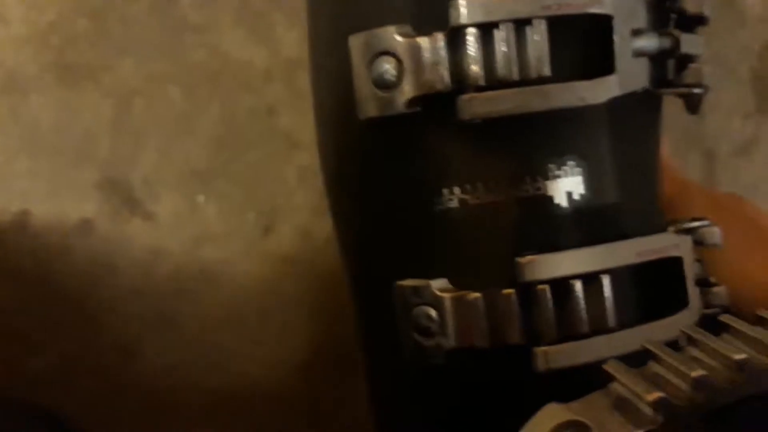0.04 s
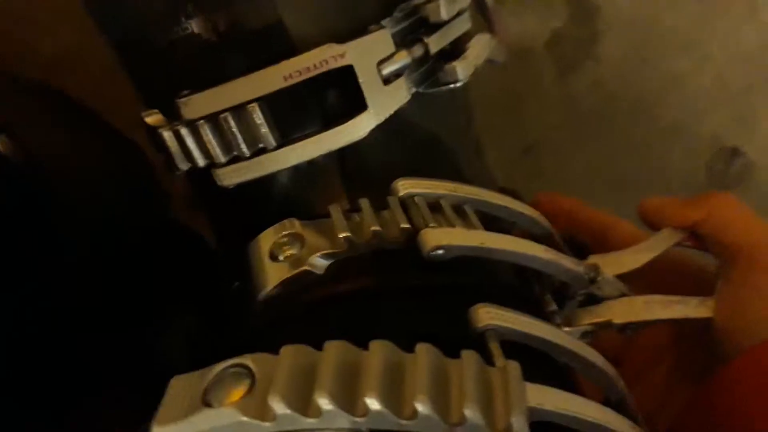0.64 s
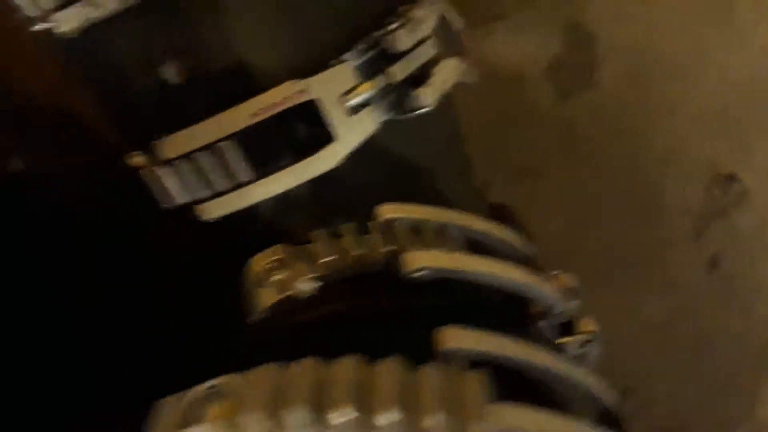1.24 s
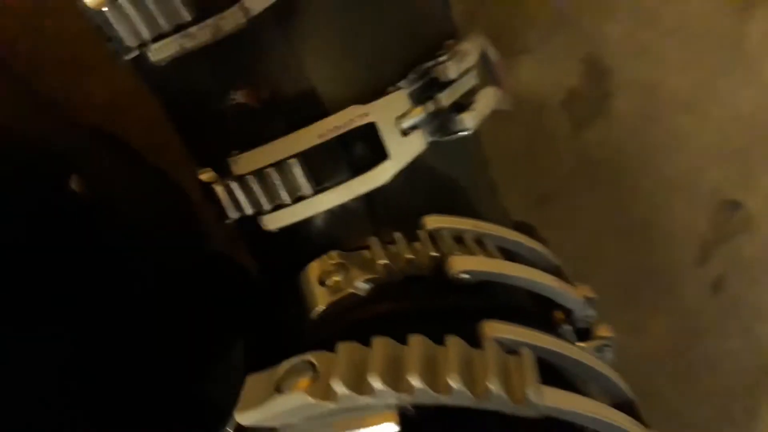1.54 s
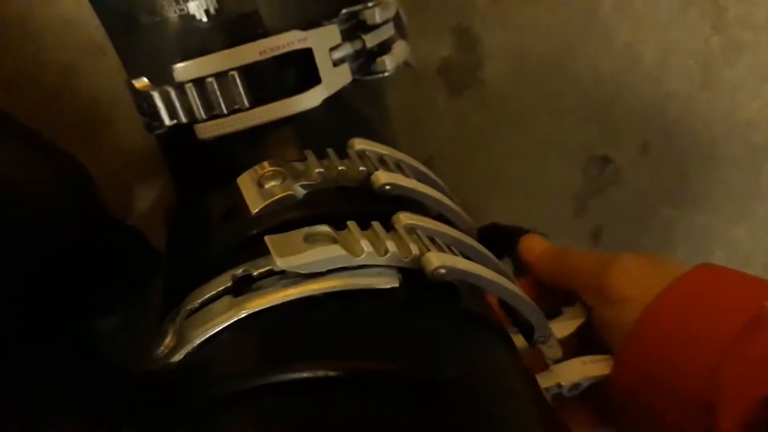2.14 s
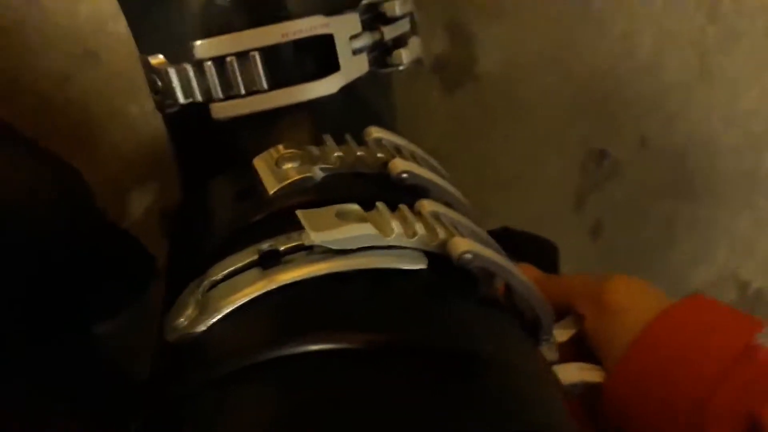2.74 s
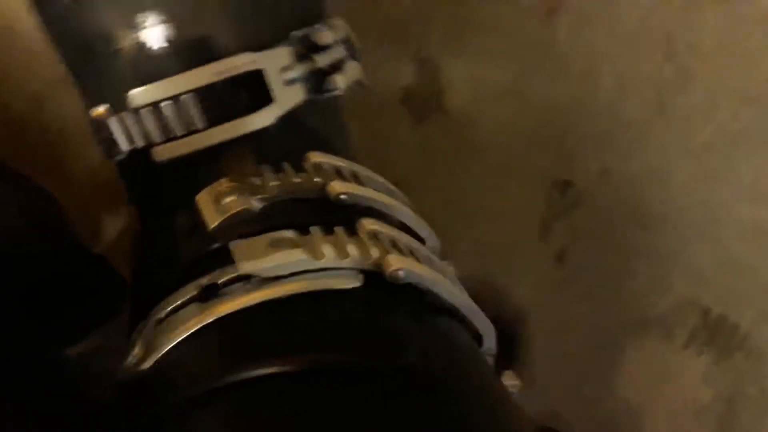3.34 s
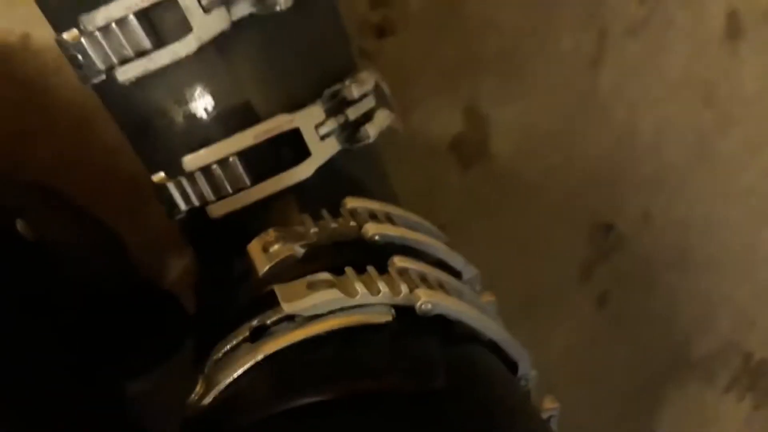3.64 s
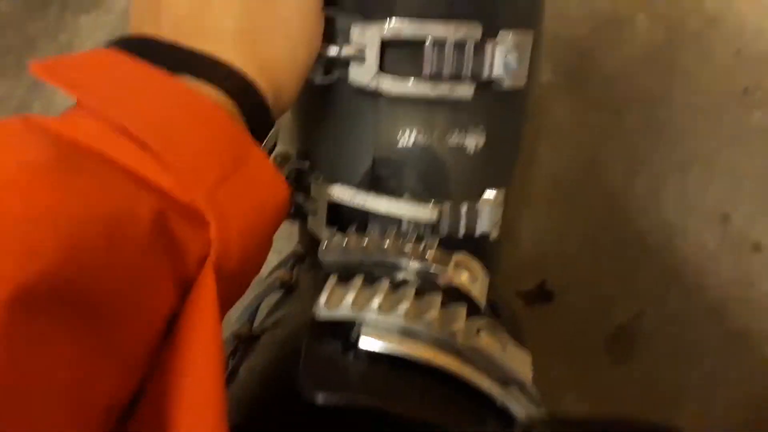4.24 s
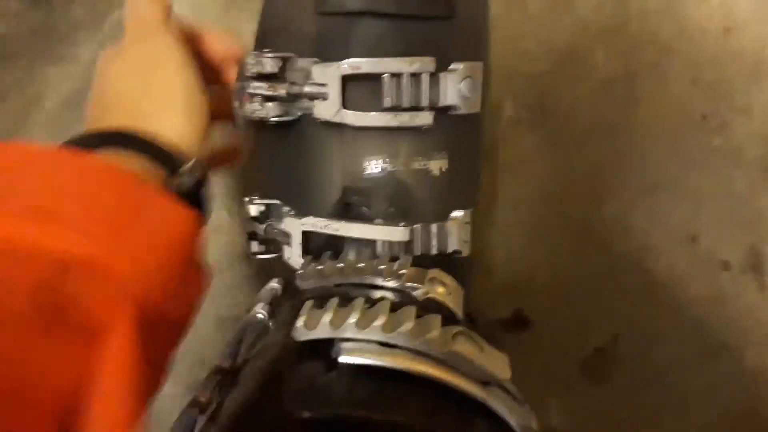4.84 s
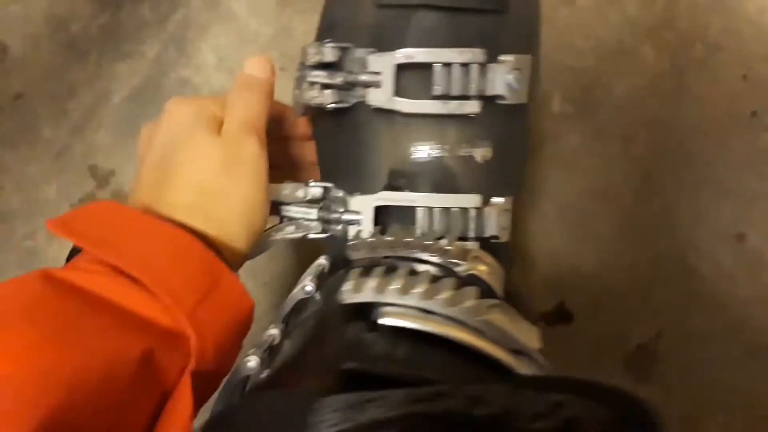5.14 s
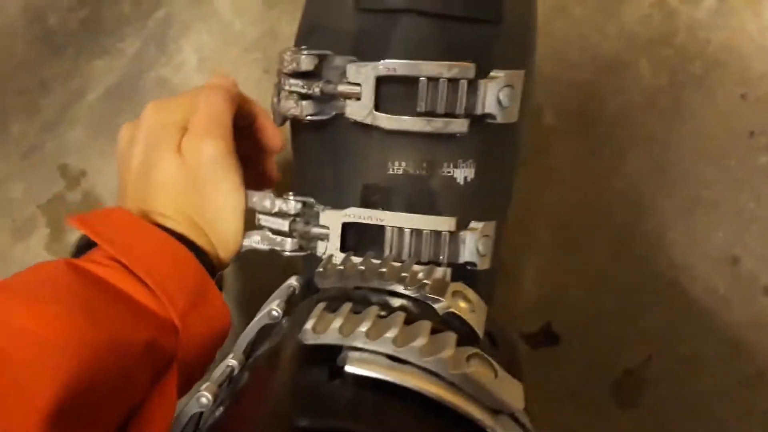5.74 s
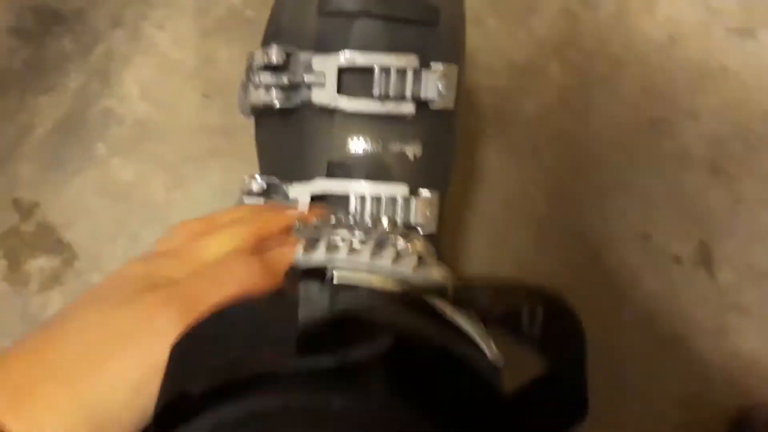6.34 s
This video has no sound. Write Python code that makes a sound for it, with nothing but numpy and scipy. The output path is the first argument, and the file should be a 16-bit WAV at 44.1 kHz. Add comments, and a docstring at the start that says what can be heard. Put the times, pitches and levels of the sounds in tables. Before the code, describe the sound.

Close up, metal buckles click and knock against a plastic ski boot, then snap closed with a sharp crack and a brief rattle. Three snaps come with light ratchet clicks and faint sleeve rustling between them. Then a tight lever gives a stuttering creak and shuts with a fourth snap, followed by a few small ticks. Each snap echoes briefly in a small, hard-walled room.

```python
"""A small room with a concrete floor, where ski boot buckles are closed by hand, close up.
Metal bails click over their ratchet teeth; four levers snap shut, thump the plastic shell and set the
room ringing. The last one creaks in stick-slip jerks as it is forced over. In between, a jacket sleeve
rustles and fingers slide on the shell, over a thin hiss and a faint rumble."""
import sys
import numpy as np
from scipy import signal
from scipy.fft import rfft, irfft
from scipy.io import wavfile

SR = 44100
rng = np.random.default_rng(int(sys.argv[2]) if len(sys.argv) > 2 else 0)


def to_wav(sig):
    """Store sig (one row per channel, or 1-D mono) as 16-bit WAV at the path in sys.argv[1].

    Samples outside -1..1 are clipped; the rate is SR.
    """
    pcm = np.clip(np.atleast_2d(sig), -1, 1) * 32767
    pcm = np.round(pcm).astype(np.int16)
    wavfile.write(sys.argv[1], SR, pcm.T)  # frames by channels


N = 291060
TIME = np.arange(N) / SR
HIT_SAMPLES = 4096
HIT_TIME = np.arange(HIT_SAMPLES) / SR
HIT_FREQS = np.maximum(np.fft.rfftfreq(HIT_SAMPLES, 1 / SR), 1)
ROOM_CHANGE_S = 4.0  # the room's colour shifts here

# Lever hits; the first leaves only its tail in the scene. The ring colours rattle and room.
# start_s, crack_db, thump_db, room_db, ring_hz, ring_db, treble_db
SNAPS = [(-.16, -8, -35, -7.5, 1370, 1.5, -3.5), (1.1644, -10, -4.5, -9, 428, 1.5, 2.5),
         (3.3344, -10, -5.5, -4.5, 900, -0.5, 4), (4.54, -7, -11.5, -1, 1130, 10, 3.5),
         (5.8677, -7, -38, -5, 480, 8, -6)]
# EQ of a snap: freq_hz, gain_db
SNAP_EQ = [(60, -14.5), (270, -2.5), (700, 2.5), (1500, 1), (2700, -3.5), (4000, -6.5), (5200, -6.5),
           (6500, -9.5), (10000, -9), (13000, -12), (16000, -16)]
def lever_snaps(thump_hz=102, thump_decay_s=0.0028, scrape_lead_s=0.0034):
    """A lever flips over centre: a brief scrape, a crack, a shell thump, a rattle and a loud room tail."""
    out = np.zeros((2, N))
    phase = 2 * np.pi * thump_hz * HIT_TIME + .5 + .17 * np.array([[1], [-1]])
    thump = np.cos(phase) * np.exp(-HIT_TIME / thump_decay_s) * (1 - np.exp(-HIT_TIME / 0.00021))
    tail_eq = [(60, -2), (200, 0.7), (600, -0.85), (2000, -0.1), (6000, 4), (14000, 8.5)]
    for start_s, crack_db, thump_db, room_db, ring_hz, ring_db, treble_db in SNAPS:
        direct = hit_tone(SNAP_EQ, 560, 5.4, treble_db)
        scrape = hit(direct, chatter_s=0.00071, chatter_db=20.5, metal_db=-12)
        add(out, start_s - scrape_lead_s, undb(crack_db - 20) * scrape)
        crack = hit(direct, chatter_s=0.00098, chatter_db=6.5, metal_db=-12.5)
        add(out, start_s, undb(crack_db) * crack + undb(thump_db) * thump)
        radiated = hit_tone(SNAP_EQ, ring_hz, ring_db, treble_db, octaves=0.53)
        add(out, start_s, undb(room_db - 11) * bail_rattle(radiated))
        walls = room_impulse(tail_eq, late=int(start_s > ROOM_CHANGE_S))
        tail = unit_energy(signal.fftconvolve(walls, irfft(radiated)[None], axes=1))
        add(out, start_s, undb(room_db) * np.sqrt(0.002 * SR) * tail)
    return out


def bail_rattle(tone, landings=7, span_s=0.07, fall_db=14):
    """The loose bails jump and land again after a snap, dying away."""
    out = np.zeros((2, 2 * HIT_SAMPLES))
    for when, softness in rng.uniform(0, 1, (landings, 2)):
        landing = hit(tone, chatter_s=0.00042, chatter_db=4, metal_db=10)
        add(out, 0.013 + span_s * when, undb(-fall_db * when - 2.3 * softness) * landing)
    return out


# Bails catching on the teeth: start_s, level_db, ring_hz, ring_db, treble_db, pan_left_db, bounce_db
CATCHES = [(.157, -57.5, 5430, 12, 27, 6, -16), (.522, -50.5, 5450, 13, 17, 4, -23),
           (.8068, -9, 1850, 5.5, -6, 5.5, -21.5), (1.0738, -16, 1590, 4, -0.5, 1.5, -8),
           (1.8183, -19, 560, 4.5, 12, 7, -17), (2.514, -19.5, 4300, -0.5, 15.5, 11, -8.5),
           (2.654, -26, 613, 6, -4.5, 4, -19), (2.8043, -21, 600, 5.5, -2.5, 8.5, -21.5),
           (2.9778, -48.5, 800, -13, -5, 11, -20), (3.15, -14, 2850, 0, 8.5, 10, -4.5),
           (3.2461, -20, 1280, 7.5, -3.5, 7.5, -16), (3.304, -9.5, 2280, 5, 12, 8.5, -12),
           (4.6316, -21, 4900, 17, 5, -25, -27), (5.0114, -30.5, 7040, 0, 14, 0, -16),
           (5.054, -30, 1188, 10.5, 13.5, 5, -24), (5.863, -13.5, 10200, 4, 33, 8, 0),
           (6.292, -30.5, 5560, 25, -7, 6, -0.5), (6.357, -36, 1040, 0, 0, 9, 0.5),
           (6.422, -41, 8000, 2, 6, 2, -20)]
# Levers and fingers knocking on the shell: start_s, level_db, ring_hz, pan_left_db
KNOCKS = [(0.5673, -39, 590, 12), (0.726, -34, 680, 7), (.788, -30, 690, -9), (.806, -8.5, 665, 3),
          (.829, -33, 650, 5), (1.0666, -22.5, 666, 5), (1.094, -24.5, 653, -1), (1.1189, -20, 700, 4),
          (1.8004, -42, 860, 9), (1.8789, -39.5, 700, 7), (2.724, -38.5, 650, 13), (3.1377, -43, 799, 9.5),
          (3.6217, -38.5, 268, -2), (4.1978, -38, 380, 3), (4.2548, -30.5, 330, -1), (4.448, -33.5, 563, 2),
          (4.5121, -27, 680, 0)]
# EQ of catches and knocks: freq_hz, gain_db
CLICK_EQ = [(60, -26), (200, -9), (450, 4), (1100, 4.5), (1600, -2), (2600, -4), (4500, -4), (6500, -8.5),
            (10000, -7.5), (13000, -14.5), (16000, -19)]
def clicks_and_knocks(bounce_s=.0073, knock_ring_db=12, knock_treble_db=-13):
    """Bails catch and bounce, the shell takes dull knocks. Returns the close sound and a reverb send."""
    blows = [(s, db, hz, knock_ring_db, knock_treble_db, pan_db) for s, db, hz, pan_db in KNOCKS]
    for start_s, level_db, *voicing, bounce_db in CATCHES:
        blows += [(start_s, level_db, *voicing), (start_s + bounce_s, level_db + bounce_db, *voicing)]
    close, send = np.zeros((2, N)), np.zeros((2, N))
    for start_s, level_db, ring_hz, ring_db, treble_db, pan_db in blows:
        tone = hit_tone(CLICK_EQ, ring_hz, ring_db, treble_db, octaves=0.39)
        click = hit(tone, chatter_s=0.0011, chatter_db=6, metal_db=0)
        pan = undb(np.array([[pan_db], [-pan_db]]) / 2)
        add(close, start_s, undb(level_db) * click * pan / np.sqrt(np.mean(pan ** 2)))
        # the walls get a blend of all directions, so the ring is flatter
        blend = hit_tone(CLICK_EQ, ring_hz, 0.29 * ring_db, treble_db, octaves=0.5)
        add(send, start_s, undb(level_db) * hit(blend, chatter_s=0.00092, chatter_db=1.5, metal_db=-15))
    return close, send


# Accents of the creak, its hardest jerks: start_s, level_db
JERKS = [(5.0974, -26.5), (5.1236, -26), (5.1654, -28), (5.1995, -25), (5.2511, -24), (5.2954, -20),
         (5.3357, -20), (5.3933, -18), (5.4139, -21.5), (5.443, -17.5), (5.4832, -17.5), (5.5651, -17.5),
         (5.6306, -15.5), (5.668, -22), (5.695, -18.5), (5.7214, -21), (5.759, -20), (5.7987, -22)]
# The creak hardens as the strap tightens: time_s, small_slip_db, treble_db
STRAIN = [(5.1, -29, -6), (5.15, -26.5, -5), (5.22, -32, -4), (5.28, -23.5, -2), (5.43, -23, -2),
          (5.47, -35, 4), (5.54, -34, 13), (5.63, -29.5, 4), (5.72, -27, 13), (5.8, -31, 17)]
# Pace of the sticking and slipping: time_s, rate_hz
SLIP_RATE = [(5.1, 42), (5.23, 24), (5.28, 48), (5.45, 52), (5.52, 76), (5.7, 76), (5.78, 50)]
# EQ of a slip: freq_hz, gain_db
CREAK_EQ = [(30, -33), (70, -11.5), (200, 1), (550, 8), (1000, 3), (1600, -2.5), (2200, -11), (3800, -7),
            (5200, -10.5), (6500, -19.5), (10000, -22), (16000, -30)]
def lever_creak(jitter_s=.0007, scatter_db=2.5, give_s=.0052, settle_s=.007, shell_hz=900):
    """The loaded lever sticks and slips on the shell: small slips fill the time between hard jerks."""
    strain_s, slip_db, treble_db = np.transpose(STRAIN)
    slips = list(JERKS)
    for (start_s, _), (end_s, _) in zip(JERKS, JERKS[1:]):
        rate_hz = np.interp((start_s + end_s) / 2, *np.transpose(SLIP_RATE))
        steps = int(round((end_s - start_s) * rate_hz))
        for s in np.linspace(start_s, end_s, steps + 1)[1:-1]:
            slips.append((rng.normal(s, jitter_s), rng.normal(np.interp(s, strain_s, slip_db), scatter_db)))
    out = np.zeros((2, N))
    for s, db in slips:
        hard_db = np.interp(s, strain_s, treble_db)
        # each slip gives before and settles after: dull taps that fade as the strap gets tight
        tap_db = np.interp(s, strain_s, slip_db) - 0.53 * hard_db
        early, late = rng.uniform(.8, 1.2, 2)
        give = (s - give_s * early, tap_db - 7, hard_db - 13)
        settle = (s + settle_s * late, tap_db - 3, hard_db - 13)
        for start_s, level_db, bright_db in [(s, db, hard_db), give, settle]:
            ring_hz = shell_hz * np.exp(rng.normal(0, 0.056))
            tone = hit_tone(CREAK_EQ, ring_hz, 4, bright_db, octaves=0.29)
            slip = hit(tone, chatter_s=0.0011, chatter_db=2, metal_db=-19, right_lag_s=.00004)
            add(out, start_s, undb(level_db) * slip)
    return out


# Metallic ring of the buckle: pitch_hz, t60_s, level_db
BUCKLE_MODES = [(2540, 0.0089, -13), (2680, .015, -8), (3430, 0.023, -15.5), (4050, .02, -15),
                (5300, 0.055, -13), (7130, .012, -15.5), (10260, .015, -13), (12150, .05, -22),
                (14300, .04, -21)]
def hit(tone, chatter_s, chatter_db, metal_db, right_lag_s=0.00011):
    """One contact: a push, a burst of chatter and the buckle's ringing modes, filtered by the tone."""
    burst = rng.standard_normal((2, HIT_SAMPLES)) * np.sqrt(HIT_TIME) * np.exp(-HIT_TIME / chatter_s)
    chatter = stereo_spectra(unit_energy(burst), split_hz=1000)
    low_cut = HIT_FREQS / (HIT_FREQS - 900j)
    force = 1 + undb(chatter_db) * chatter * low_cut
    ring = 0
    for pitch_hz, t60_s, level_db in BUCKLE_MODES:
        detune = rng.normal(1, 0.0027)
        phase = 2 * np.pi * pitch_hz * detune * HIT_TIME + rng.uniform(0, 2 * np.pi, (2, 1))
        ring += undb(level_db) * unit_energy(np.sin(phase) * undb(-60 * HIT_TIME / t60_s))
    delay = np.exp(-2j * np.pi * HIT_FREQS * np.array([[0], [right_lag_s]]))
    blow = irfft((force + undb(metal_db) * rfft(ring)) * tone * delay)
    return unit_energy(blow * np.linspace(1, 0, HIT_SAMPLES)) * np.sqrt(0.0014 * SR)


def hit_tone(eq, ring_hz, ring_db, treble_db, octaves=0.52):
    """Filter for a contact: base EQ, one broad resonance and a treble shelf."""
    bell_db = ring_db * np.exp(-.5 * (np.log2(HIT_FREQS / ring_hz) / octaves) ** 2)
    shelf_db = treble_db * HIT_FREQS ** 2 / (HIT_FREQS ** 2 + 2800 ** 2)
    cepstrum = irfft(np.log(undb(curve_at(eq, HIT_FREQS) + bell_db + shelf_db)))
    # minimum phase keeps the attack sharp
    cepstrum[1:HIT_SAMPLES // 2] *= 2
    cepstrum[HIT_SAMPLES // 2 + 1:] = 0
    return np.exp(rfft(cepstrum))


# Arm moves: start_s, length_s, rub_db, swish_db
STROKES = [(0.73, 0.19, -58, -47), (0.984, 0.4, -44, -50), (1.55, 0.47, -68.5, -75),
           (2.498, 0.28, -64, -62), (2.86, 0.065, -70, -62), (4.1, 0.22, -52, -52.5),
           (4.407, 0.3, -44.5, -41), (4.697, 0.32, -57, -57), (4.849, 0.22, -85, -45.5),
           (5.052, 0.24, -49.5, -43.5), (5.39, 0.47, -37, -42.5), (6.03, .3, -55, -52)]
# EQs of the low rub and the airy swish: freq_hz, gain_db
RUB_EQ = [(30, -38), (70, -16.5), (150, 1.5), (280, 2.5), (600, -3.5), (1300, -4.5), (2500, -7),
          (5000, -29)]
SWISH_EQ = [(500, -7), (1500, -0.5), (3200, -1.5), (5000, 8), (6500, -5), (10500, -3.5), (13000, -8.5),
            (16000, -6)]
def sleeve_rustle():
    """Nylon rubs and swishes with each stroke of the arm."""
    envelopes = np.zeros((2, N))
    for start_s, length_s, rub_db, swish_db in STROKES:
        add(envelopes, start_s, undb([[rub_db], [swish_db]]) * swell(length_s))
    rub = noise(RUB_EQ) * envelopes[0] * flutter(rate_hz=70, depth_db=2)
    swish = noise(SWISH_EQ) * envelopes[1] * flutter(rate_hz=190, depth_db=1.5)
    return rub + swish


# Slides over the shell: start_s, length_s, level_db, peak_hz
SLIDES = [(1.065, 0.034, -34, 1500), (1.083, 0.13, -40.5, 4620), (1.75, 0.072, -58, 900),
          (3.568, 0.29, -67.5, 1695), (3.6, 0.058, -54, 1690), (4.232, 0.19, -54, 276),
          (6.087, 0.12, -44.5, 3730), (6.277, 0.079, -40.5, 5590)]
def finger_slides():
    """Fingers and cloth slide over the shell in short, grainy swells of friction noise."""
    out = np.zeros((2, N))
    for start_s, length_s, level_db, hz in SLIDES:
        eq = [(hz / 20, -35), (hz / 6, -16), (hz / 2, -6), (hz, 0), (hz * 2, -9), (hz * 10, -48)]
        friction = noise(eq, size=SR) * flutter(rate_hz=300, depth_db=3)[:SR]
        add(out, start_s, undb(level_db) * friction * swell(length_s))
    return out


# Reverb time: freq_hz, t60_s
ROOM_DECAY = [(80, 0.5), (250, 0.63), (560, 0.52), (1470, 0.49), (3880, 0.33), (10200, 0.3), (16000, 0.2)]
# The room's colour, one curve before and one after ROOM_CHANGE_S: freq_hz, gain_db
ROOM_EQ = [
    [(50, -6.5), (120, -1.5), (190, -1), (270, -2), (700, 2), (1500, -0.5), (2400, 2), (4000, 1.5),
     (9000, -0.5)],
    [(50, -34), (120, 3), (190, 1), (270, 1.5), (700, -6), (1500, -0.5), (2400, -0.5), (4000, 3),
     (9000, -1)],
]
# Low room resonances and the higher ring of shell and buckle: pitch_hz, t60_s, early_db, late_db
LINGERING_TONES = [(162.3, 0.68, -37, -14), (245, 0.72, -22, -26), (262.3, .9, -26.5, -23),
                   (301.6, 0.66, -22.5, -19.5), (388, 0.21, -25.5, -22), (485, 0.78, -23, -43.5),
                   (543, 0.43, -22, -34.5), (667, 0.33, -25.5, -26), (931, .4, -27, -43),
                   (1045, .35, -31, -44), (1306, 0.45, -30, -37), (1855, .35, -28.5, -27),
                   (2280, .35, -26, -35)]
def room_impulse(eq, late, predelay_s=0.004, build_s=0.0026):
    """The walls answer after a few ms and the treble dies first; room, shell and buckle tones linger."""
    t = np.arange(SR) / SR
    freqs = np.maximum(np.fft.rfftfreq(SR, 1 / SR), 1)
    gain = undb(curve_at(eq, freqs) + curve_at(ROOM_EQ[late], freqs))
    spectrum = stereo_spectra(rng.standard_normal((2, SR)), split_hz=800) * gain
    bands_hz = np.geomspace(60, 16000, 12)
    wash, tones = 0, 0
    for hz, share in zip(bands_hz, np.eye(len(bands_hz))):
        band = irfft(spectrum * np.interp(np.log(freqs), np.log(bands_hz), share), SR)
        wash += band * undb(-60 * t / curve_at(ROOM_DECAY, hz))
    for hz, t60_s, *levels_db in LINGERING_TONES:
        tones += undb(levels_db[late]) * unit_energy(np.sin(2 * np.pi * hz * t) * undb(-60 * t / t60_s))
    onset = 1 - np.exp(-np.maximum(t - predelay_s, 0) / build_s)
    return (unit_energy(wash) + undb(-5) * tones) * onset


def reverb(send, eq):
    """The room's answer, in one colour before ROOM_CHANGE_S and another after."""
    after = TIME > ROOM_CHANGE_S
    return sum(signal.fftconvolve(send * active, room_impulse(eq, late), axes=1)[:, :N]
               for late, active in enumerate([~after, after]))


# Fader rides of the hiss and the rumble: time_s, level_db
HISS_FADER = [(.25, -77), (.555, -80), (.565, -56), (1.0, -56), (1.6, -63), (1.8, -61), (2.1, -65.5),
              (3.3, -62.5), (3.8, -71.5), (4.025, -87.5), (4.034, -54), (4.118, -75.5), (4.123, -48),
              (4.26, -53.5), (4.33, -56), (5.5, -46.5), (6.25, -49), (6.6, -52.5)]
RUMBLE_FADER = [(0, -98), (.55, -90), (.6, -71.5), (1.6, -100), (1.8, -73.5), (3.1, -72.5), (3.9, -83),
                (4.1, -91), (4.15, -100), (6.6, -85)]
# EQ of the hiss: freq_hz, gain_db
HISS_EQ = [(500, -7), (1400, -1), (2600, -4), (3800, -3), (5000, 2), (6500, -4), (10500, -2), (13000, -6),
           (16000, -5)]
def background():
    """A thin, flickering hiss and a faint low rumble come and go."""
    hiss = noise(HISS_EQ) * flutter(rate_hz=280, depth_db=1.2)
    hiss *= undb(np.interp(TIME, *np.transpose(HISS_FADER)))
    rumble = noise([(20, -18.5), (55, -5.5), (110, -0.5), (300, -22.5), (2000, -52.5)])
    rumble *= undb(np.interp(TIME, *np.transpose(RUMBLE_FADER)))
    return hiss + rumble


def undb(db):
    """Decibels to gain."""
    return 10 ** (np.asarray(db) / 20)


def curve_at(points, hz):
    """Read (freq_hz, value) points along a logarithmic frequency axis."""
    freqs, values = np.transpose(points)
    return np.interp(np.log(hz), np.log(freqs), values)


def add(track, start_s, sound):
    """Mix a two-channel sound into a track."""
    start = int(round(start_s * SR))
    first, end = max(start, 0), min(start + sound.shape[1], track.shape[1])
    if end > first:
        track[:, first:end] += sound[:, first - start:end - start]


def unit_energy(x):
    """Scale to a mean energy of one per channel."""
    return x / np.sqrt(np.mean(np.sum(x ** 2, axis=-1)))


def stereo_spectra(pair, split_hz=850):
    """Spectra at two close microphones: long waves are shared, short ones differ."""
    freqs = np.fft.rfftfreq(pair.shape[1], 1 / SR)
    mid, side = rfft(pair)
    width = np.clip(.27 + freqs ** 3 / (freqs ** 3 + split_hz ** 3), 0, 1)
    return np.array([mid + width * side, mid - width * side]) / np.sqrt(1 + width ** 2)


def noise(eq, size=N):
    """Stereo noise through an EQ, rms one."""
    freqs = np.maximum(np.fft.rfftfreq(size, 1 / SR), 1)
    x = irfft(stereo_spectra(rng.standard_normal((2, size))) * undb(curve_at(eq, freqs)), size)
    return x / x.std()


def flutter(rate_hz, depth_db):
    """A gain that wanders at random around one."""
    knots = rng.standard_normal(4096)
    return undb(depth_db * np.interp(TIME * rate_hz, np.arange(len(knots)), knots))


def swell(length_s):
    """A stroke speeds up and slows down again: half a sine."""
    return np.sin(np.pi * np.clip(TIME[:SR] / length_s, 0, 1))


def scene():
    """Buckles up front, the room around them, cloth and background underneath."""
    bed = background() + sleeve_rustle() + finger_slides()
    snaps = lever_snaps()
    clicks, send = clicks_and_knocks()
    click_room = reverb(send, eq=[(80, 9), (330, 11.5), (900, 3.5), (1600, 5), (2800, 5),
                                  (6000, 0.5), (14000, -1)])
    creak = lever_creak()
    creak_room = reverb(creak, eq=[(80, 8), (300, 10), (1000, 1), (2500, 5.1), (6000, 2.2), (14000, 1)])
    return snaps + clicks + creak + undb(-12.5) * click_room + undb(-9.5) * creak_room + bed


def record(dry):
    """A soft clip rounds the sharpest peaks; a steep low-pass cuts the top."""
    ceiling, top_hz = .85, 15900
    low_pass = signal.ellip(10, .2, 90, top_hz, fs=SR, output="sos")
    return signal.sosfilt(low_pass, ceiling * np.tanh(dry / ceiling))


dry = scene()
out = record(dry)
to_wav(out)
```